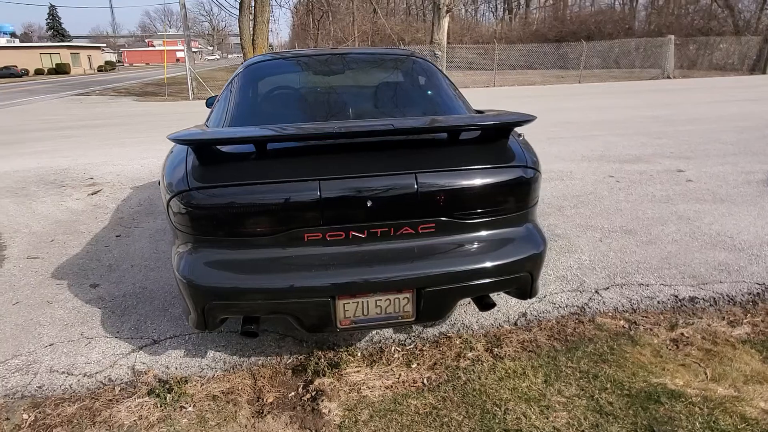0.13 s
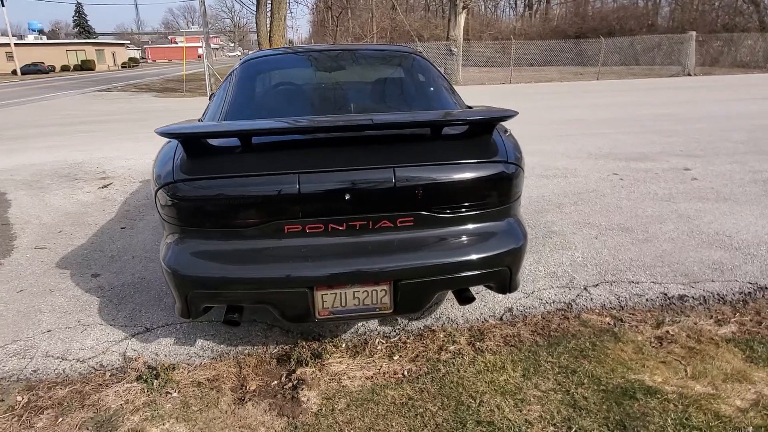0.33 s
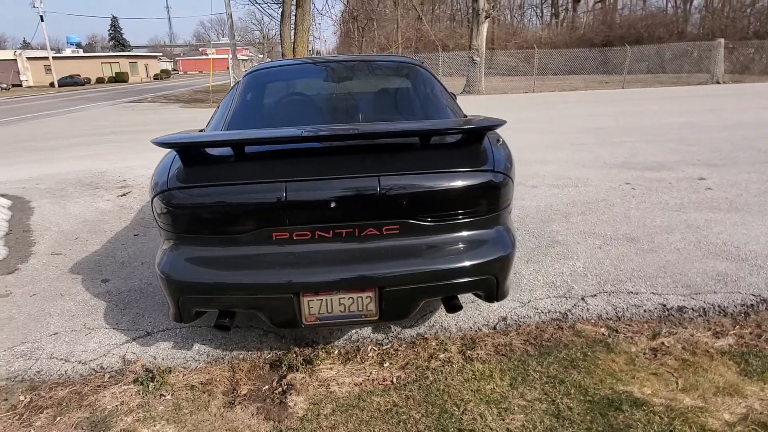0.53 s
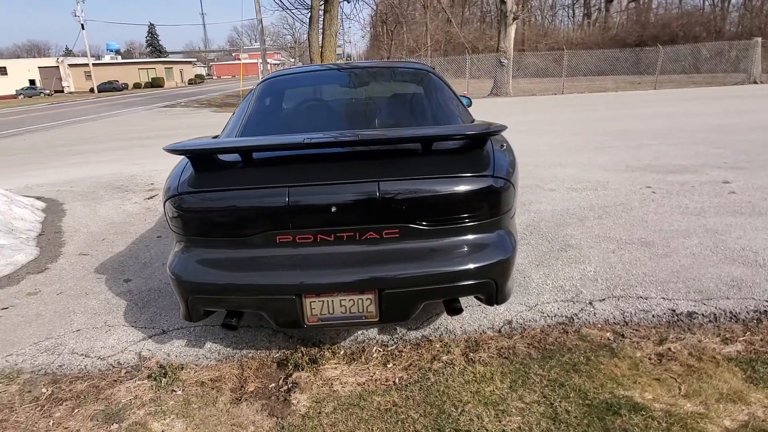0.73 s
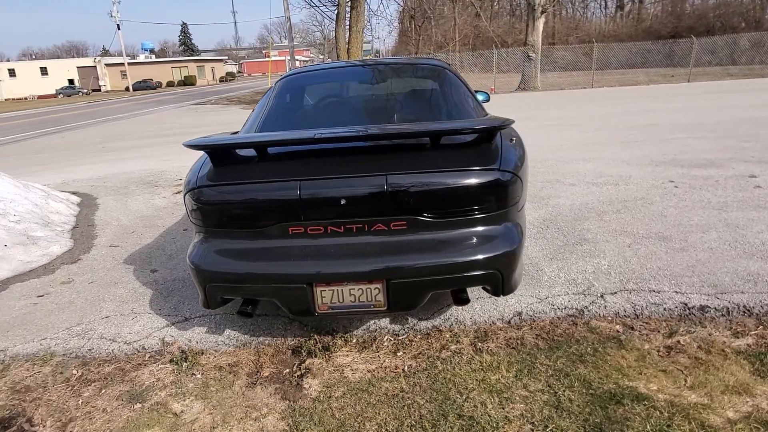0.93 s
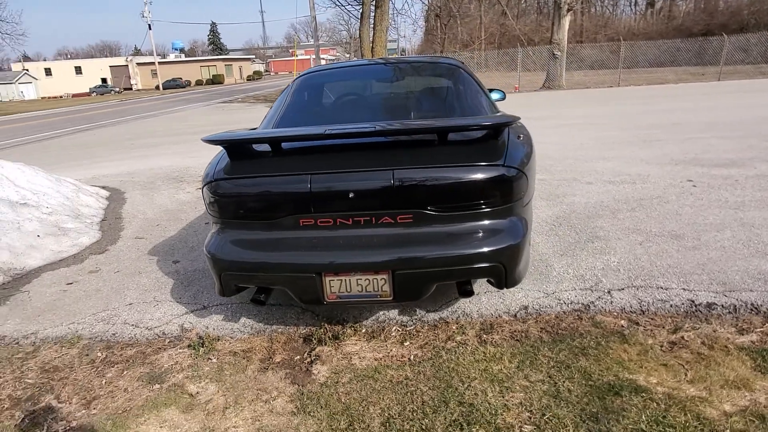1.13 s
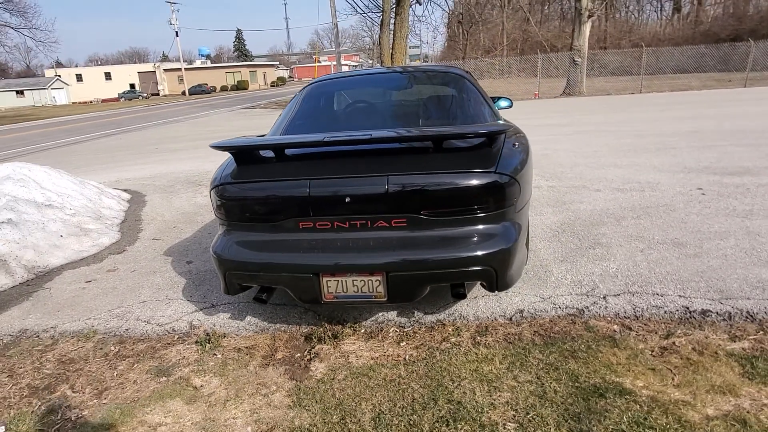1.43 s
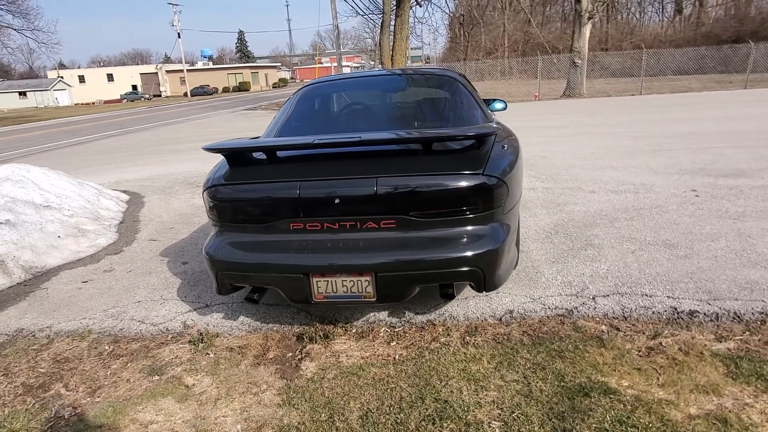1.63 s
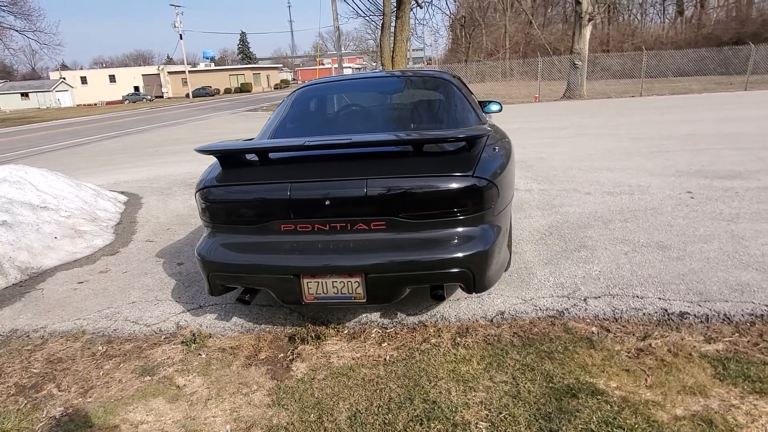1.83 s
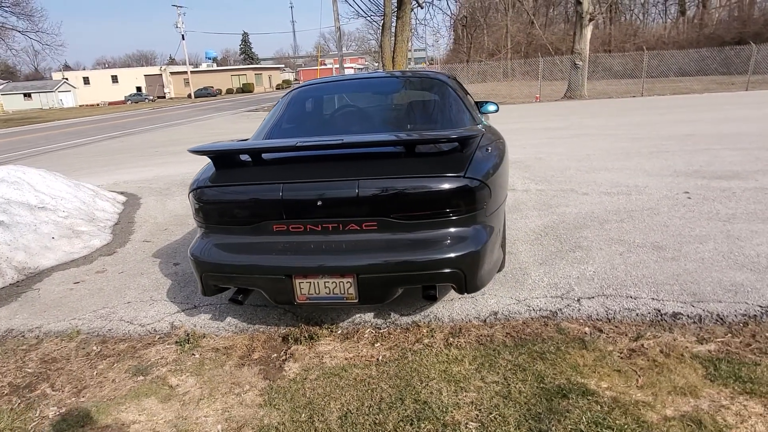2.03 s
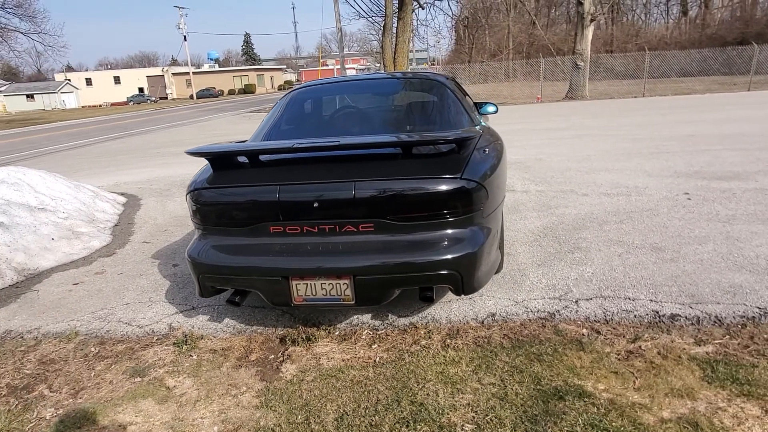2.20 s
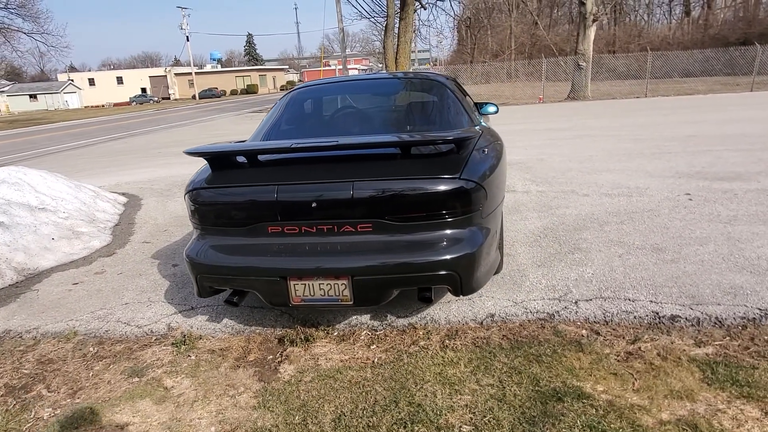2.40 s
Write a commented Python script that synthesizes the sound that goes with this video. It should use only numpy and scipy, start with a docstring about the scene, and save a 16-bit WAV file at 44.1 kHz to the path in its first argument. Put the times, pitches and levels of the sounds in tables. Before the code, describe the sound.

A large car engine idles with a lumpy, irregular beat, deep exhaust thumps and throaty chuffs over a low rumble, heard outdoors in an open lot a few steps behind the tailpipes on a stereo handheld microphone.

```python
"""Big engine idling with a lumpy cam

Heard in an open lot from a few steps behind the tailpipes. Strong firings come unevenly: each is a
pressure push through the muffler, with pipe echoes and a low boom. Its gas puff opens with a throaty
chuff, rings the tailpipe as noise through resonances, and leaves the pipe ends as a hiss.
Weaker firings, a jittered pulse train blurred by reflections, fill in between.
"""
import sys
import numpy as np
from scipy import signal
from scipy.fft import rfft, irfft
from scipy.io import wavfile
from scipy.ndimage import uniform_filter1d

SR = 44100
rng = np.random.default_rng(int(sys.argv[2]) if len(sys.argv) > 2 else 0)


def log_audio(samples):
    """Write samples as a 16-bit WAV file to the path given in sys.argv[1]."""
    # one column per channel
    frames = np.atleast_2d(samples).T
    # limit to full scale, then quantise
    limited = np.clip(frames, -1, 1)
    pcm = np.round(limited * 32767).astype(np.int16)
    wavfile.write(sys.argv[1], SR, pcm)


N = 112896
HZ = np.fft.rfftfreq(N, 1 / SR)

# Strong firings. Each row: time in seconds, push in dB relative to PUSH_DB, push width (standard
# deviation) in ms, pipe ring in dB, favoured ring pitch in Hz, hiss in dB.
STRONG_FIRINGS = [(0.1142, -11, 1.2, -29, 820, -53), (0.134, -3, 1.5, -40.5, 980, -37.5),
                  (0.153, -16, 0.077, -38, 754, -56), (0.183, -22, 0.6, -29.5, 1066, -41),
                  (0.2009, -3.5, 1.2, -30.5, 1092, -50), (0.2328, -4, 2.7, -39, 950, -57),
                  (0.261, -34.5, 0.82, -53, 710, -66), (0.2959, -12.5, 0.6, -31.5, 994, -44),
                  (0.3035, -16.5, 1.46, -43.5, 1384, -55), (0.3271, -33.5, 0.41, -33, 764, -55),
                  (0.3396, -5.5, 1.04, -36, 898, -43), (0.3542, -11, 1.9, -35, 798, -52),
                  (0.3877, -7.5, 1.17, -33, 730, -43.5), (0.406, -13, 0.88, -40, 844, -45.5),
                  (0.4354, -13.5, 1.2, -32.5, 747, -41), (0.4547, -7.5, 0.65, -33.5, 1063, -59),
                  (0.5355, -2, 2.24, -39, 1370, -50.5), (0.5667, -8.5, 1.86, -39, 740, -66),
                  (0.5855, -6.5, 0.82, -33.5, 1327, -51.5), (0.6196, -11, 1.3, -49, 744, -66),
                  (0.6519, -4, 1.43, -36, 1470, -43), (0.6784, -3.5, 4.6, -32.5, 796, -47),
                  (0.699, -15, 1, -30.5, 1006, -43), (0.7121, -8.5, 1.4, -40, 795, -60),
                  (0.7181, -14, 0.6, -30.5, 1425, -55), (0.7319, -10, 1.3, -39, 814, -48),
                  (0.7985, -3, 1.5, -28.5, 1470, -52), (0.8477, -11.5, 0.95, -40.5, 640, -69),
                  (0.878, -8, 1.35, -61, 760, -54.5), (0.9121, -8.5, 1.47, -30.5, 938, -45.5),
                  (0.9395, -10.5, 2.33, -40, 967, -79), (0.9503, -9.5, 1.9, -40.5, 752, -78),
                  (0.979, -4, 1.45, -30.5, 1080, -52.5), (1.0124, -17.5, 1.1, -45, 752, -81),
                  (1.0317, -9.5, 0.99, -36.5, 710, -51.5), (1.0655, -6.5, 1.33, -35.5, 1284, -42),
                  (1.081, -9.5, 0.73, -36, 780, -47), (1.09, -16, 0.58, -37, 735, -66),
                  (1.116, -17, 0.79, -41.5, 1084, -68), (1.133, -7.5, 1.1, -45, 732, -49.5),
                  (1.1546, -23, 1.8, -36, 710, -50.5), (1.1841, -6.5, 1, -32, 1470, -47.5),
                  (1.2049, -3, 5.8, -39, 942, -65), (1.2529, -3, 1.49, -30, 1210, -51),
                  (1.287, -14, 0.67, -44, 777, -61), (1.3203, -12.5, 1.8, -50.5, 730, -63.5),
                  (1.3397, -6, 3, -35, 1470, -45), (1.357, -12, 1.3, -48, 1570, -61),
                  (1.3916, -7, 1.45, -31, 1090, -51.5), (1.409, -7, 1.4, -29, 572, -48.5),
                  (1.4355, -3.5, 1.7, -37.5, 1570, -57.5), (1.4617, -3.5, 1.07, -32, 970, -44),
                  (1.5181, -17, 0.66, -44, 1604, -70), (1.5308, -2, 1.87, -28, 1202, -51.5),
                  (1.563, -5, 1.64, -38, 755, -49), (1.5829, -11.5, 1.23, -38, 962, -56.5),
                  (1.598, -4, 1.9, -42, 764, -56), (1.615, -9.5, 1.3, -34, 980, -51),
                  (1.623, -21, 1, -29.5, 1457, -49), (1.6658, -13, 0.66, -34.5, 1140, -55),
                  (1.7, -14.5, 1.52, -51, 776, -72), (1.7361, 2, 2.27, -36.5, 977, -43.5),
                  (1.7453, 1.5, 2.8, -40, 1090, -64), (1.7717, -10, 1.36, -49, 751, -75),
                  (1.811, -7, 1.8, -34, 1040, -52), (1.827, -5.5, 1.6, -30.5, 1073, -42),
                  (1.834, -31.5, 1, -33, 630, -60), (1.845, -13.5, 0.96, -32, 712, -45.5),
                  (1.8808, -11, 0.72, -37.5, 750, -51), (1.8974, -4.5, 1.85, -36, 1510, -61),
                  (1.9049, -11.5, 1.2, -39.5, 1070, -45), (1.9485, -6.5, 1.43, -29.5, 1111, -54),
                  (1.9803, -11, 1.6, -43.5, 784, -65), (2.016, -5.5, 1.58, -35, 996, -44.5),
                  (2.064, -13, 0.97, -27, 1467, -42.5), (2.0807, -11, 0.57, -29, 1504, -46),
                  (2.1113, -5.5, 1.8, -32.5, 1334, -45), (2.1386, -5, 1.3, -34, 1520, -47.5),
                  (2.1653, -8, 1.2, -38, 775, -60), (2.201, -16.5, 0.66, -29, 1046, -44),
                  (2.2141, -7, 1.45, -32.5, 1383, -43.5), (2.222, -20.5, 0.75, -46.5, 726, -69),
                  (2.2415, -19, 0.92, -57.5, 1036, -69.5), (2.2591, -3, 1.7, -36.5, 966, -56),
                  (2.2699, -9.5, 2.9, -34.5, 1145, -46.5), (2.289, -12, 0.73, -35.5, 1038, -44),
                  (2.3302, -23.5, 1.6, -51.5, 794, -69), (2.3501, -12.3, 2.1, -47, 1040, -51.5),
                  (2.381, -6.5, 1.34, -33, 1466, -46), (2.3992, -13, 1.3, -31, 1036, -48.5),
                  (2.4464, -3.5, 1.3, -27, 1480, -46.5), (2.4751, -9.5, 0.81, -38, 945, -51),
                  (2.5245, -11.5, 0.94, -47.5, 1470, -61)]
# Echoes of the push in the pipe. Each row: delay in seconds, signed share of the push.
PIPE_ECHOES = [(0.0116, 0.41), (0.0214, -0.17), (0.0592, -0.31)]
# Spectrum shape of the weak firings. Each row: frequency in Hz, relative level in dB.
WEAK_SPECTRUM = [(30, -15), (45, -2.5), (130, 3.5), (200, -6.5), (260, -15), (330, -20), (420, -46),
                 (520, -65), (800, -54), (1600, -120)]
# Tailpipe resonances. Each row: centre in Hz, width in Hz, relative level in dB.
PIPE_RESONANCES = [(284.7, 10, 8.5), (351, 11, -3), (609.6, 48, 1), (767.8, 14, 1.5), (918, 6.7, -4),
                   (1038, 47, 3), (1254, 76, -2), (1478, 33, -0.5), (2093, 60, -5.5), (2323, 47, -7),
                   (2908, 77, -8), (3750, 780, -21)]
# Spectrum shape of the hiss. Each row: frequency in Hz, relative density in dB per Hz.
HISS_SPECTRUM = [(1300, -8.5), (1800, -7), (2400, 0.5), (2900, -2.5), (3800, -2), (4900, -7), (5600, 0.5),
                 (6800, -3.5), (7600, -11), (9000, -8.5), (10400, -17.5), (12000, -8), (14500, -13),
                 (15500, -9.5)]
# Stereo likeness. Each row: frequency in Hz, left-right likeness from 0 to 1.
LIKENESS = [(60, 0.99), (300, 0.99), (700, 1), (1400, 0.66), (2500, 0.077), (15000, 0.52)]
# Stereo balance. Each row: frequency in Hz, left minus right in dB.
BALANCE = [(60, 0.4), (250, -2.5), (600, -4), (1200, 0), (2400, -2.5), (4400, -10), (8000, -2),
           (15000, -1.5)]
# Stereo lag. Each row: frequency in Hz, time in ms by which left is late.
LEFT_LAG = [(60, .16), (150, .15), (300, .07), (1400, .08), (2600, .27), (15000, .29)]

WEAK_PER_S, WEAK_JITTER_PERIODS, WEAK_DB = 116, 0.26, -23
WEAK_DELAY_AT_300_HZ_S = 0.01253

HISS_STEADY_DB, HISS_FLUTTER_DB, PATCH_DB = -67, 1.5, 3
HISS_LEAD_S, HISS_RISE_S, HISS_HOLD_S, HISS_T60_S = 0.0039, 0.0033, 0.008, 0.1
HISS_TAIL_DB, HISS_TAIL_T60_S = -2, 0.16  # tail level relative to the jet

RING_DB, RING_SPREAD_DB, RING_STEADY_DB = -2.5, 3, -41
RING_LEAD_S, RING_RISE_S, RING_HOLD_S, RING_T60_S = 0.004803, 0.002, 0.0099, 0.053
FAVOUR_DB, FAVOUR_WIDTH_HZ = 1.5, 320
DRIFT_SHARE, DRIFT_S = 0.01, 0.08  # rms wander of the resonances, smoothing span

CHUFF_WIDTH_HZ, CHUFF_RISE_S, CHUFF_T60_S = 330, 0.001, 0.054
CHUFF_SAG = 0.33  # share of the favoured pitch lost per CHUFF_T60_S
CHUFF_LOW_HZ, CHUFF_HIGH_HZ = 580, 1510  # band the tailpipe passes
CHUFF_ROUGH, CHUFF_THROB, CHUFF_THROB_MIN_S = 0.45, 0.35, 0.0055

PUSH_DB, PUSH_LEAD_S = 41.5, 0.00422  # push centre ahead of the firing time
MUFFLER_HZ, MUFFLER_WIDTH_HZ, MUFFLER_EDGE_HZ = 142.9, 44.9, 325
THROAT_HZ, THROAT_WIDTH_HZ, THROAT_DB = 216, 61.6, 3.5  # upper muffler chamber
BOOM_HZ, BOOM_WIDTH_HZ, BOOM_DB, BOOM_DELAY_S = 57.26, 12.1, 12.5, 0.0024

START_S, LOW_CUT_HZ, EDGE_HZ, CEILING = 0.1053, 38, 15850, 1.3


def amp(db):
    """Amplitude factor of a level in dB."""
    return 10 ** (np.asarray(db) / 20)


def evened(x):
    """Scales a signal to rms 1."""
    return x / np.sqrt(np.mean(x ** 2) + 1e-20)


def read(points, hz):
    """Reads a (Hz, value) table, interpolated over log frequency."""
    f, value = np.transpose(points)
    return np.interp(np.log(hz + 1), np.log(f + 1), value)


def late(s):
    """Spectrum of a delay in seconds."""
    return np.exp(-2j * np.pi * HZ * s)


def peak(hz, width_hz):
    """Spectrum of a band-pass resonance with gain 1 at its centre."""
    return 1j * HZ * width_hz / (hz ** 2 - HZ ** 2 + 1j * HZ * width_hz)


def resonate(x, hz, width_hz):
    """Resonance that follows the curve hz; white noise in gives the same power out."""
    turn = np.exp(2j * np.pi * np.cumsum(hz) / SR)
    r = np.exp(-np.pi * width_hz / SR)
    ringing = signal.lfilter([1], [1, -r], x / turn)
    return np.sqrt(2 * (1 - r ** 2)) * (turn * ringing).real


def add(mix, s, sound):
    """Adds a sound into the mix from s seconds on."""
    part = mix[..., round(s * SR):][..., :sound.shape[-1]]
    part += sound[..., :part.shape[-1]]


def puffs(times, sizes, rise_s, hold_s, t60_s):
    """Envelope with one rise, hold and decay per firing; powers add."""
    t = np.arange(SR // 4) / SR
    shape = np.minimum(t / rise_s, 1) * amp(-60 * np.maximum(t - hold_s, 0) / t60_s)
    train = np.bincount(np.round(times * SR).astype(int), sizes ** 2, N)
    power = signal.oaconvolve(train, shape ** 2)[:N]
    return np.sqrt(abs(power))


def patchy(x):
    """Lets patches of pitch and time flicker, alike in both channels."""
    z = signal.stft(x, nperseg=256, noverlap=192)[2]
    field = uniform_filter1d(rng.standard_normal(z.shape[1:]), size=4, axis=0)
    field = uniform_filter1d(field, size=6, axis=1)
    return signal.istft(z * amp(PATCH_DB * evened(field)), nperseg=256, noverlap=192)[1][:, :N]


def weak_firings():
    """Jittered pulses of random signed size, drawn apart for each channel, blurred by reflections."""
    draws = rng.uniform(-1.255, 1, (N // 250, 2, 2))
    periods = np.arange(len(draws)) + WEAK_JITTER_PERIODS * draws[:, 0, 0]
    at = (periods / WEAK_PER_S * SR).astype(int)
    keep = (at >= 0) & (at < N)
    trains = np.array([np.bincount(at[keep], draws[keep, 1, k], N) for k in range(2)])
    # delay grows in proportion to frequency
    blur = np.exp(-1j * np.pi * WEAK_DELAY_AT_300_HZ_S * HZ ** 2 / 300)
    pulses = irfft(rfft(trains) * blur * amp(read(WEAK_SPECTRUM, HZ)), N)
    return rfft(amp(WEAK_DB) * evened(pulses))


def hiss():
    """Jets of gas leaving the pipe ends, fluttering, with a short duller tail off the ground and the car."""
    s, *_, hiss_db = np.transpose(STRONG_FIRINGS)
    jet = puffs(s - HISS_LEAD_S, amp(hiss_db), HISS_RISE_S, HISS_HOLD_S, HISS_T60_S)
    flutter = evened(uniform_filter1d(rng.standard_normal(N), size=50))
    jet = jet * amp(HISS_FLUTTER_DB * flutter)
    # the tail rises as long as the jet holds
    tail = puffs(s, amp(hiss_db + HISS_TAIL_DB), HISS_HOLD_S, HISS_HOLD_S, HISS_TAIL_T60_S)
    tail = tail + amp(HISS_STEADY_DB)
    noise = rfft(rng.standard_normal((2, 2, N))) * amp(read(HISS_SPECTRUM, HZ)) * (HZ > 1200)
    bright = evened(irfft(noise[0], N))
    dull = evened(irfft(noise[1] / (1 + (HZ / 5000) ** 2), N))
    return rfft(patchy(jet * bright + tail * dull))


def pipe_ring():
    """Gas noise rings the tailpipe; puffs favour resonances near their pitch; all wander with gas heat."""
    s, _, _, ring_db, ring_hz, _ = np.transpose(STRONG_FIRINGS)
    colour_db = RING_SPREAD_DB * rng.standard_normal((len(s), len(PIPE_RESONANCES)))
    weight = np.sqrt(sum(amp(db) ** 2 for _, _, db in PIPE_RESONANCES))
    span = round(DRIFT_S * SR)
    out = 0
    for k, (hz, width_hz, db) in enumerate(PIPE_RESONANCES):
        favour_db = FAVOUR_DB * np.exp(-((hz - ring_hz) / FAVOUR_WIDTH_HZ) ** 2)
        size = amp(ring_db + RING_DB + favour_db + colour_db[:, k])
        gust = puffs(s - RING_LEAD_S, size, RING_RISE_S, RING_HOLD_S, RING_T60_S)
        drive = np.hypot(gust, amp(RING_STEADY_DB)) * rng.standard_normal((2, N))
        wander = evened(uniform_filter1d(uniform_filter1d(rng.standard_normal(N), span), span))
        out = out + resonate(drive, hz * (1 + DRIFT_SHARE * wander), width_hz) * amp(db) / weight
    low_hz, high_hz = 0.71 * PIPE_RESONANCES[0][0], 1.85 * PIPE_RESONANCES[-1][0]
    return rfft(out) / np.sqrt((1 + (low_hz / (HZ + 1)) ** 8) * (1 + (HZ / high_hz) ** 8))


def chuffs():
    """Front of each puff: a throaty, throbbing burst near its favoured pitch, sagging as it dies."""
    t = np.arange(2000) / SR
    out = np.zeros((2, N))
    r = np.exp(-np.pi * CHUFF_WIDTH_HZ / SR)
    shape = np.minimum(t / CHUFF_RISE_S, 1) * amp(-60 * t / CHUFF_T60_S)
    for s, _, _, ring_db, ring_hz, _ in STRONG_FIRINGS:
        # the first half of the noise only settles the filter
        noise = rng.standard_normal((2, 2, 2 * len(t)))
        a, b = signal.lfilter([1], [1, -r], noise)[..., len(t):]
        wobble = (a + 1j * b) * np.sqrt(1 - r ** 2)
        start, pace = rng.random(2)
        pitch_hz = ring_hz * (1.05 - CHUFF_SAG * t / CHUFF_T60_S)
        turn = np.exp(2j * np.pi * (start + np.cumsum(pitch_hz) / SR))
        throb_s = CHUFF_THROB_MIN_S * (1 + 0.34 * pace)
        throb = 1 - CHUFF_THROB * np.cos(2 * np.pi * t / throb_s)
        burst = ((throb + CHUFF_ROUGH * wobble) * turn).real
        add(out, s - RING_LEAD_S, amp(ring_db) * shape * burst)
    return rfft(out) / np.sqrt((1 + (CHUFF_LOW_HZ / (HZ + 1)) ** 12) * (1 + (HZ / CHUFF_HIGH_HZ) ** 12))


def pushes():
    """Bell-shaped pressure pushes, sharp or soft, through the muffler, the pipe echoes and the boom."""
    t = np.arange(-400, 400) / SR
    train = np.zeros(N)
    for s, push_db, width_ms, *_ in STRONG_FIRINGS:
        bell = np.exp(-0.5 * (1000 * t / width_ms) ** 2)
        add(train, s - PUSH_LEAD_S + t[0], amp(push_db) * bell / bell.sum())
    muffler = MUFFLER_HZ ** 2 / (MUFFLER_HZ ** 2 - HZ ** 2 + 1j * HZ * MUFFLER_WIDTH_HZ)
    # the upper chamber swings against the push
    muffler = muffler - amp(THROAT_DB) * peak(THROAT_HZ, THROAT_WIDTH_HZ)
    muffler = muffler / np.sqrt(1 + (HZ / MUFFLER_EDGE_HZ) ** 10)
    echoes = 1 + sum(share * late(s) for s, share in PIPE_ECHOES)
    boom = amp(BOOM_DB) * late(BOOM_DELAY_S) * peak(BOOM_HZ, BOOM_WIDTH_HZ)
    return amp(PUSH_DB) * rfft(train) * (muffler * echoes + boom)


def scene():
    """Two microphone ports: alike in the bass, partly apart in the treble, the left a little later."""
    near, other = weak_firings() + pipe_ring() + chuffs() + hiss()
    push = pushes()
    same = np.clip(read(LIKENESS, HZ), 0, 1)
    right = push + near
    left = push + same * near + np.sqrt(1 - same ** 2) * other
    # half of the balance and lag on each side; ms to s
    tilt = amp(read(BALANCE, HZ) / 2) * late(read(LEFT_LAG, HZ) / 2000)
    return irfft(np.array([left * tilt, right / tilt]), N)


def record(dry):
    """Low cut, silence until a 1 ms fade-in at START_S, soft ceiling on the peaks, band limit."""
    cut = signal.sosfilt(signal.butter(6, LOW_CUT_HZ, "high", fs=SR, output="sos"), dry)
    cut = cut * np.clip((np.arange(N) / SR - START_S) / 0.001, 0, 1)
    cut = cut / (1 + (cut / CEILING) ** 4) ** 0.25
    band = signal.firwin(511, EDGE_HZ, window=("kaiser", 9), fs=SR)
    return signal.oaconvolve(cut, band[None], "same")


dry = scene()
out = record(dry)
log_audio(out)
```